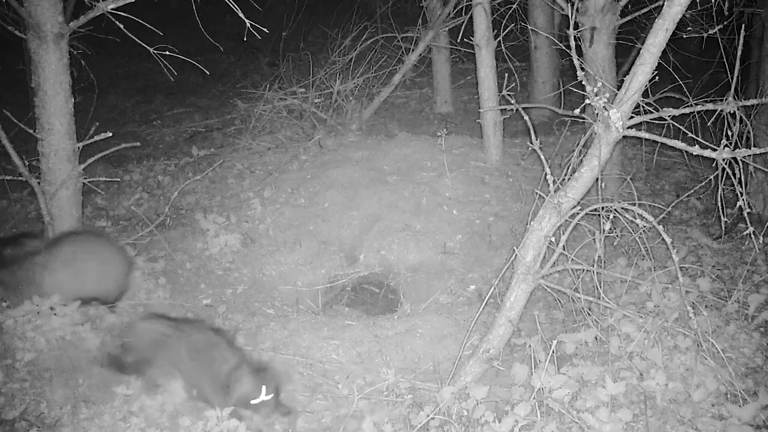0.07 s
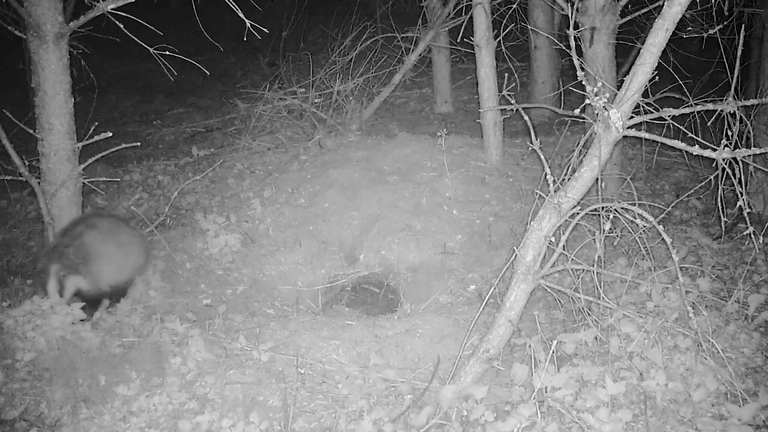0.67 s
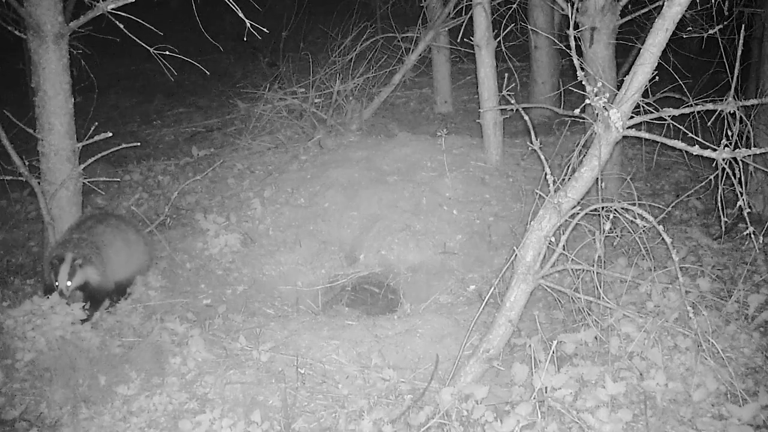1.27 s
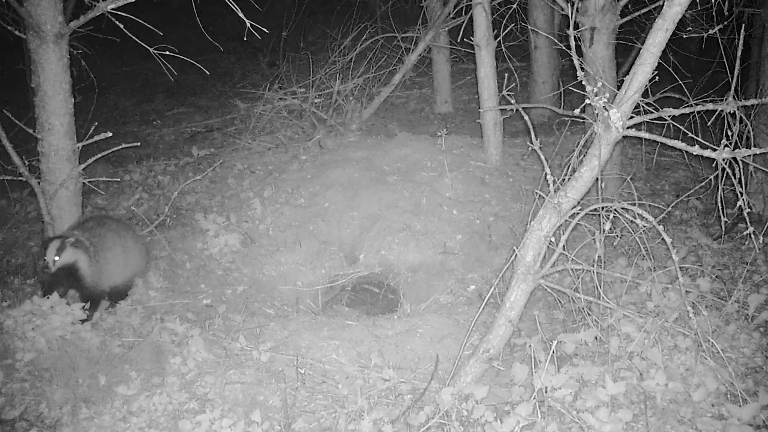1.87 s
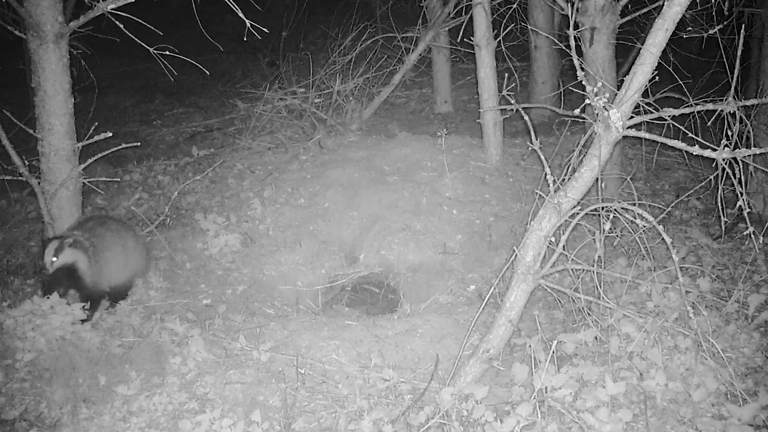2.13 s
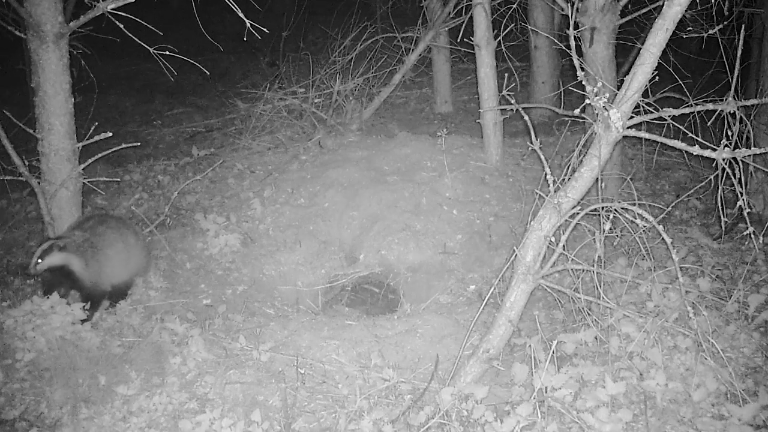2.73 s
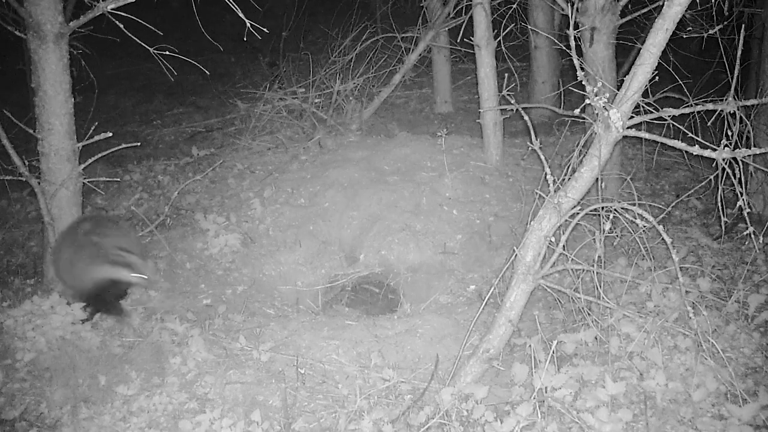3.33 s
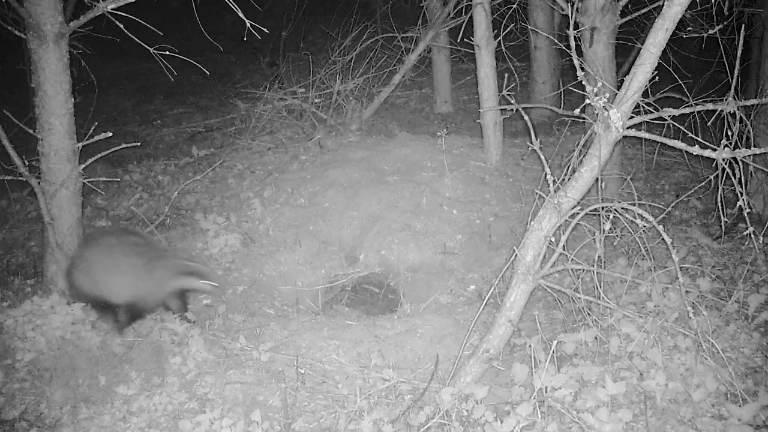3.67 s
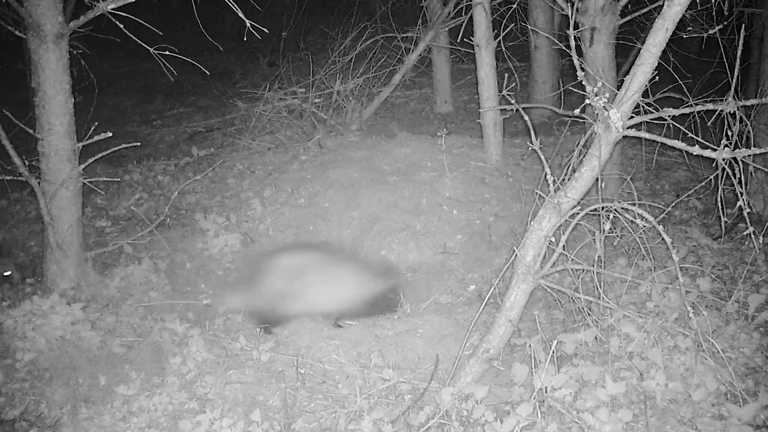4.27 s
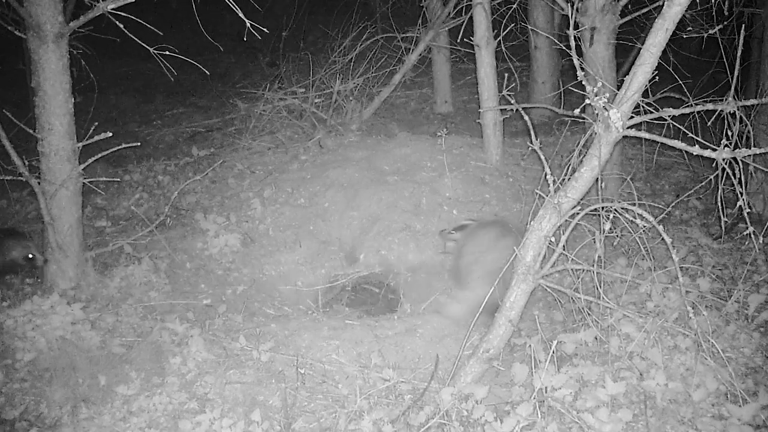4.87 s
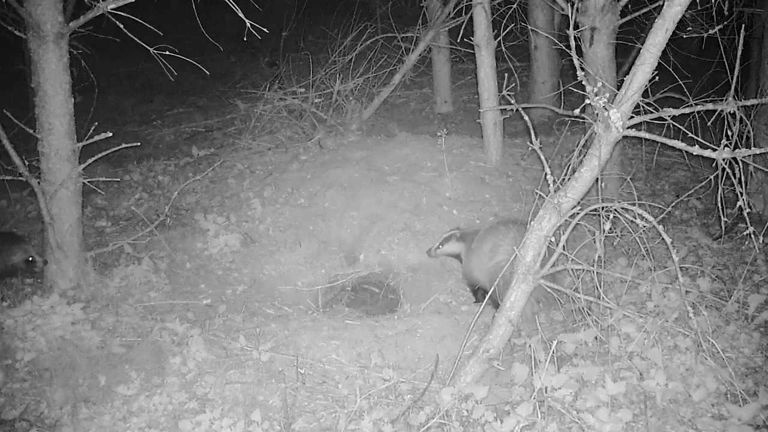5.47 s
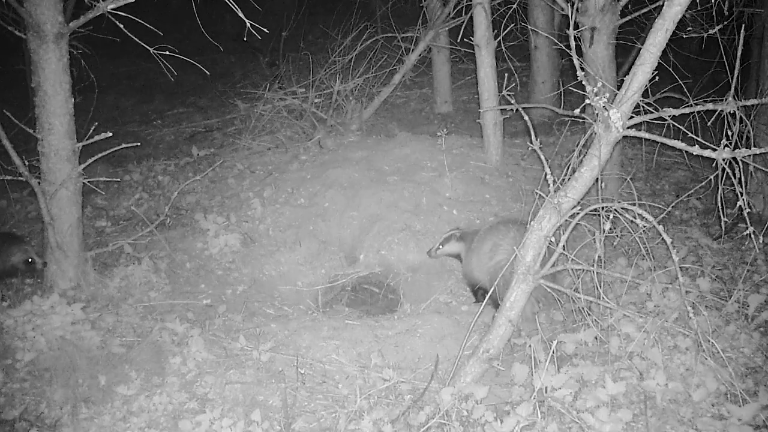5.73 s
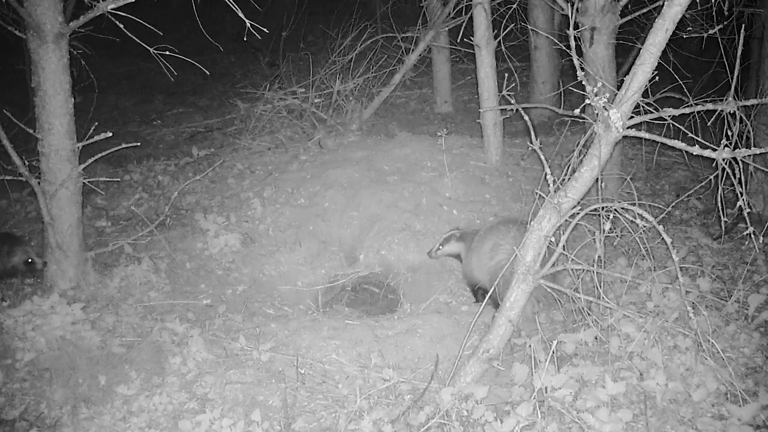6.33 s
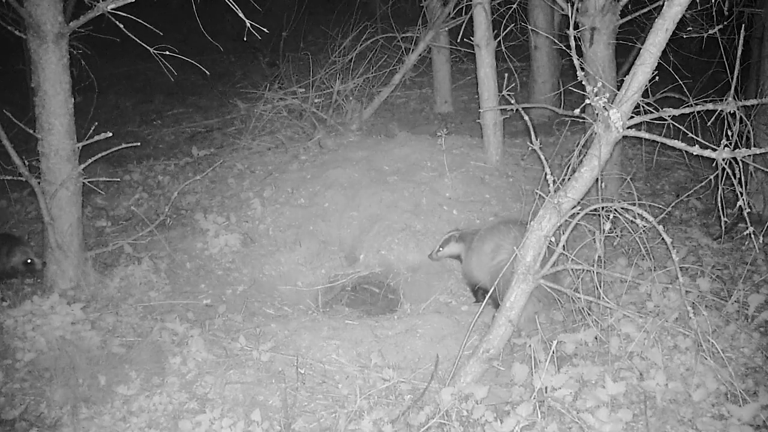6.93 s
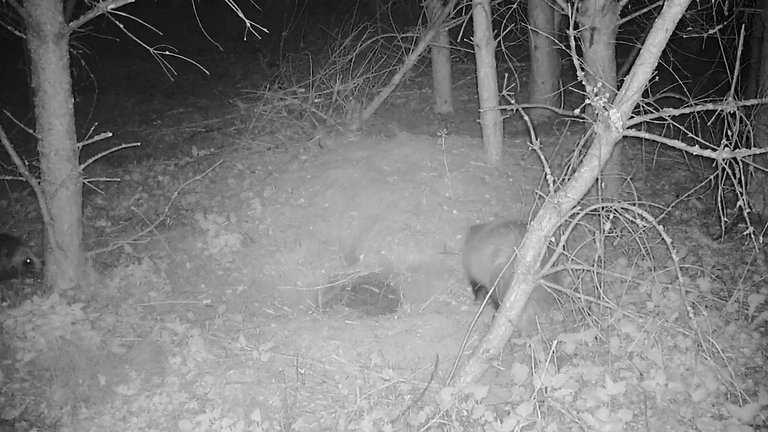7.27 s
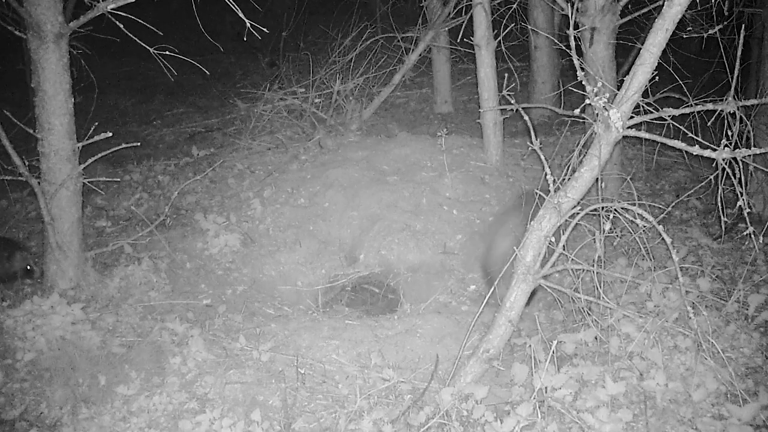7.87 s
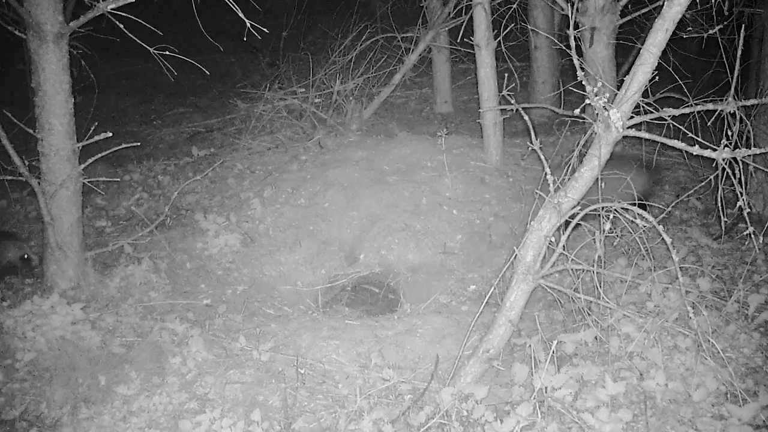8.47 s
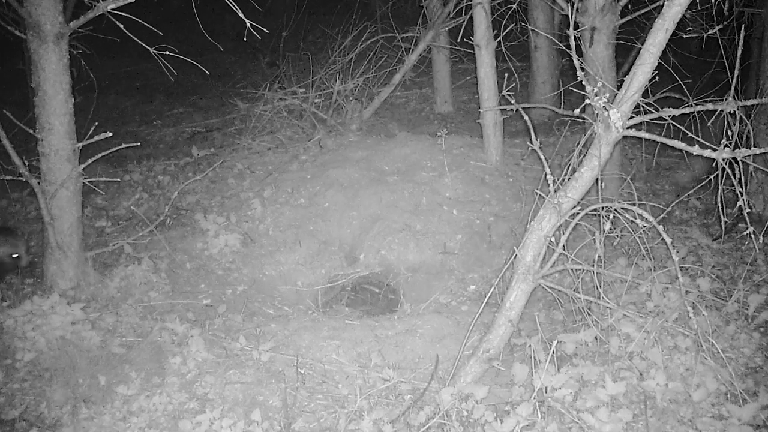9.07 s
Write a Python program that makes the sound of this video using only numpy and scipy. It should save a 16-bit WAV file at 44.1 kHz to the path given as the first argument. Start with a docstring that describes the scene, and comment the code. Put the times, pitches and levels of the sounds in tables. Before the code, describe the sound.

Close to a hissing, faintly whistling trail camera in the woods, a badger snarls, screams harshly and trails off in a drawn-out whine and rasping breath. Under the cry, two animals scuffle with dull thuds, crackling leaves and snapping twigs. After a pause, softer steps and low, creaking growls follow. The hiss drops out twice for an instant, then paws knock on wood and patter off through the leaves.

```python
"""Two badgers fight in leaf litter at night, near a trail camera that hisses and whistles thinly.
First a hoarse snarl, air forced past a flapping throat, breaks into a rattling scream, while paws
thud on soil, crush leaves and snap twigs. The scream clears to a long whine that ends in rasps by
2 s. From 3.5 s come low, creaky growls. After 6 s the camera's sound cuts out twice. Last, paws
knock on fallen wood and rustle away over leaves and twigs."""
import sys
import numpy as np
from scipy import signal
from scipy.io import wavfile
from scipy.ndimage import uniform_filter1d

SR = 44100
rng = np.random.default_rng(int(sys.argv[2]) if len(sys.argv) > 2 else 0)


def to_wav(sig):
    """Store sig (one row per channel, or 1-D mono) as 16-bit WAV at the path in sys.argv[1].

    Samples outside -1..1 are clipped; the rate is SR.
    """
    pcm = np.clip(np.atleast_2d(sig), -1, 1) * 32767
    pcm = np.round(pcm).astype(np.int16)
    wavfile.write(sys.argv[1], SR, pcm.T)  # frames by channels


N = 406161
T = np.arange(N) / SR
SCREAM_S, WHINE_S, CRY_END_S = .408, .69, 1.9  # the scream starts, turns to a whine, and stops
CLOSING_S = .15  # how long the mouth takes to close at the end of the whine


# The scream's tune. Each row: time in seconds, pitch in Hz.
SCREAM_TUNE = [(.408, 1132), (.435, 1302), (.458, 1345), (.52, 1060), (.61, 826), (.69, 730)]
# How the throat shapes the scream. Each row: frequency in Hz, boost or cut in dB.
SCREAM_TONE = [(100, -47), (450, -36), (620, -15), (780, -3), (1000, 1), (1270, 7.5), (1520, 3.5),
               (1720, 7.5), (1950, -3.5), (2150, 5), (2380, -5.5), (2700, 4.5), (3000, -2.5), (3450, 4.5),
               (4050, -2.5), (4900, -6.5), (5600, -29), (6700, -15.5), (11000, -56)]

def scream(start_db=-17, hold_s=.064, sag_db_per_s=18, release_s=.0079, swoop=.14, jitter=.165):
    """Shrill vocal folds grow rough as a rattle chops them into bursts, each swooping up in pitch."""
    t = np.arange(SCREAM_S, WHINE_S + release_s / 2, 1 / SR)
    age = t - SCREAM_S
    hz = follow(SCREAM_TUNE, t)[0]
    opening = rattle(t)
    rough = np.interp(age, [0, .12], [.23, .494])  # the share of breath in the voice
    effort_db = start_db - sag_db_per_s * np.maximum(age - hold_s, 0)
    bend = 1 + swoop * (opening - .7) + jitter * rough * wander(t, 900) + .01995 * wander(t, 89.74)
    cycles = np.cumsum(hz * bend) / SR
    # no two cycles are alike, which smears the overtones
    folds = sum(np.cos(2 * np.pi * k * cycles + min(k - 1, 2) * wander(t, 1800)) for k in range(1, 9))
    breath = evened((.64 + np.exp(-(cycles % 1) / .67)) * rng.standard_normal(len(t)))
    chop = (.64 + opening) * gain_of(1.2 * wander(t, 223.4))
    voice = colour(((1 - rough) * evened(folds) + rough * breath) * chop, SCREAM_TONE)
    # the treble brightens with effort and at the height of each burst
    body = low_pass(voice, hz=4200, order=6)
    treble = (voice - body) * gain_of(2.8 * (effort_db - effort_db.mean())) * (.5 + .5 * opening)
    release = np.minimum((t[-1] - t) / release_s, 1)
    return t[0], gain_of(effort_db) * evened(body + treble) * release * fade(t, .0012)


def rattle(t, fast_per_s=85, slow_per_s=66.2, slows_at_s=.48):
    """How far the throat stands open, 0 to 1. It flaps a little unevenly, fast and then slower."""
    fast_flaps = fast_per_s * (np.minimum(t, slows_at_s) - SCREAM_S)
    slow_flaps = slow_per_s * np.maximum(t - slows_at_s, 0)
    flaps = fast_flaps + slow_flaps + .045 * wander(t, 70.4)
    return np.sin(np.pi * (flaps % 1) ** .75) ** 2


# The whine's tune. Each row: time in seconds, pitch in Hz.
WHINE_TUNE = [(0.7, 727), (0.706, 733), (0.858, 718.7), (1.202, 643.5), (1.308, 654), (1.358, 628),
              (1.406, 644), (1.568, 654.5), (1.578, 641.3), (1.7, 649.5), (1.72, 669), (1.89, 676)]
# How the throat shapes the whine's overtones. Each row: frequency in Hz, boost or cut in dB.
WHINE_TONE = [(1250, 3), (1450, -9), (1950, 0), (2080, 0), (2180, 1), (3200, 0.5), (3600, -6.5), (3950, -9),
              (4500, -20), (4950, -10), (5150, -11.5), (5350, -13), (5800, -29), (9000, -28)]

def whine(sag_db_per_s=2.75, strain_s=.2, push_s=.23, shimmer_db=1.6, fray=.035):
    """The vocal folds settle into a clear cry as the strain of the scream wears off."""
    t = np.arange(WHINE_S, CRY_END_S, 1 / SR)
    age = t - WHINE_S
    hz = follow(WHINE_TUNE, t)[0]
    strain = .066 + .62 * np.exp(-(age / strain_s) ** 2)
    bend = 1 + .0039 * (1 + 3 * strain) * wander(t, 500) + .0033 * wander(t, 43.8)
    cycles = np.cumsum(hz * bend) / SR
    sag_db = sag_db_per_s * age
    push_db = 8 * np.exp(-(age / push_s) ** 2)  # the scream's push lingers in the overtones
    # as the mouth closes, the overtones fade fast and the base note slowly
    closing_s = np.maximum(t - CRY_END_S + CLOSING_S, 0)
    base_db = -36.5 - sag_db - 5 * strain - 43 * closing_s
    overtone_db = -33 - sag_db + push_db - 260 * closing_s
    fourth_db = -33.5 - sag_db - 9 * strain - 260 * closing_s
    # harmonics 2 and 3 share the overtone level between them
    second, third = (gain_of(db_at(WHINE_TONE, k * hz)) for k in (2, 3))
    overtone_db -= 20 * np.log10(np.hypot(second, third))
    # harmonic 4 flutters more once the pitch has sunk
    flutter_db = 6 * np.interp(t, [1.1, 1.2], [.15, 1])
    fourth_db += flutter_db * np.minimum(wander(t, 95.5), .8)
    voice = np.zeros(len(t))
    for k in range(1, 14):
        db = {1: base_db, 4: fourth_db}.get(k, overtone_db + db_at(WHINE_TONE, k * hz))
        hoarse = 1 + .27 * strain * wander(t, 450)
        blur = fray * max(k - 5, 0) * wander(t, 700)  # only the top overtones fray
        level = np.sqrt(2) * gain_of(db + shimmer_db * wander(t, 40.7)) * hoarse
        voice += level * np.cos(2 * np.pi * (k * cycles + blur + rng.random()))
    breath = colour(rng.standard_normal(len(t)) * (1 + np.cos(2 * np.pi * cycles)), SCREAM_TONE)
    voice += breath * gain_of(overtone_db - 28 + 37.2 * strain)
    chop = 1 + strain * (rattle(t) - .5)
    return t[0], voice * chop * fade(t, .005)


# The snarl's one swell. Its row: peak time in seconds, level in dB, rise and fall in seconds.
SNARL_SWELL = [(.21, -27, 0.45, 0.31)]
# How the throat shapes the snarl. Each row: frequency in Hz, boost or cut in dB.
SNARL_TONE = [(100, -36), (300, -8.5), (600, -10), (850, 2.5), (1100, 3.5), (1250, -4.5), (1680, 2),
              (2200, -13), (3100, -7), (3750, 1), (4300, -1.5), (5400, -24), (6500, -6.5), (9000, -32)]

def snarl():
    """Hoarse breath through a half-open mouth, up to the start of the scream."""
    return 0, hoarse_breath(SNARL_SWELL, SNARL_TONE, flutter_hz=104.8, depth=1.8, until_s=SCREAM_S)


# Rasps in the throat. Each row: peak time in seconds, level in dB, rise and fall in seconds.
RASP_SWELLS = [(1.618, -34, 0.049, .08), (1.76, -37.5, 0.11, 0.18), (1.925, -42, 0.037, 0.061)]
# How the throat shapes the rasps. Each row: frequency in Hz, boost or cut in dB.
RASP_TONE = [(100, -28), (600, -12.5), (1100, 0), (1800, -8), (2500, -5), (3700, -19), (4600, 5.5),
             (5400, -17), (9000, -22)]

def rasp(shut_treble_db=-9):
    """Hoarse breath as the whine gives out; it gets duller as the mouth closes."""
    breath = hoarse_breath(RASP_SWELLS, RASP_TONE, flutter_hz=114.7, depth=2.9, until_s=2)
    body = low_pass(breath, hz=2600, order=3)
    shut = np.clip((T[:len(breath)] - CRY_END_S + CLOSING_S) / CLOSING_S, 0, 1)
    return 0, body + (breath - body) * gain_of(shut_treble_db * shut)


def hoarse_breath(rows, tone, flutter_hz, depth, until_s):
    """Air forced past unevenly flapping tissue comes out in quick puffs."""
    t = T[T < until_s]
    flaps = np.cumsum(flutter_hz * (1 + .28 * wander(t, 120))) / SR
    puffs = (1 + depth * np.exp(-(flaps % 1) / .45)) * rng.standard_normal(len(t))
    return swells(rows)[:len(t)] * colour(puffs, tone) * fade(t, .0036)


# Low growls, one list for each. Each row: time in seconds, pitch in Hz, level in dB.
GROWL_TUNES = [
    [(3.54, 118.4, -59), (3.65, 131.7, -49.5), (3.88, 128.3, -50), (4.02, 118.6, -55), (4.14, 115.6, -55.5),
     (4.26, 101, -57), (4.34, 104, -61)],
    [(4.66, 108, -56), (4.75, 140, -50), (4.82, 129.4, -50), (4.9, 135, -53)],
    [(4.67, 92, -60), (4.95, 82.3, -67), (5.12, 90.6, -64), (5.27, 98, -58), (5.45, 94, -63),
     (5.58, 92, -63)],
]

def growl(rows, octave_db=-18):
    """With the mouth closed, little gets out but a wavering low note and its faint octave."""
    t = np.arange(rows[0][0], rows[-1][0], 1 / SR)
    hz, db = follow(rows, t)
    phase = 2 * np.pi * np.cumsum(hz * (1 + .032 * wander(t, 57.7))) / SR
    note = evened(np.sin(phase) + gain_of(octave_db) * np.sin(2 * phase))
    return t[0], note * gain_of(db + 1.6 * wander(t, 39.3)) * fade(t, .02)


# Creaks over the growls. Each row: start and length in seconds, pulses per second, level in dB.
THROAT_CREAKS = [(4.675, .045, 40, -46.5), (4.765, .1, 43, -51), (4.926, .22, 42.8, -50),
                 (5.24, .04, 48, -52)]
# How the throat shapes a creak. Each row: frequency in Hz, boost or cut in dB.
CREAK_TONE = [(50, -50), (300, -16), (700, -10), (1100, 0), (1650, -3.5), (2050, -11), (4000, -28)]

def creak(start, length, per_s, db):
    """The vocal folds snap slowly; each snap rings the throat, with a small puff behind it."""
    t = np.arange(0, length, 1 / SR)
    clicks = pulses(np.full(len(t), per_s)) * gain_of(2 * np.tanh(wander(t, 43)))
    puffs = .08 * linger(clicks, seconds=.004) * rng.standard_normal(len(t))
    return start, gain_of(db) * colour(clicks + puffs, CREAK_TONE)


# Paws in the leaves, near and far. Each row: peak time in seconds, level in dB, fall in seconds.
NEAR_PAWS = [(.035, -36, 0.22), (.16, -42, 0.11), (.345, -47, .06), (.395, -40, .03), (.58, -40, 0.096),
             (.7, -41, 0.045), (.827, -38, 0.029), (.922, -29, 0.058), (1.07, -35.5, 0.17),
             (1.205, -30, 0.089), (1.37, -37, 0.16), (1.5, -43, 0.081), (1.625, -44.5, .2)]
FAR_PAWS = [(3.455, -46, 0.21), (3.565, -42.5, 0.083), (3.72, -49, 0.077), (3.825, -50, .04),
            (3.905, -45.5, 0.06), (3.955, -49.5, 0.066), (4.21, -50, .05), (4.58, -46.5, 0.12),
            (8.73, -41.5, 0.17), (8.95, -44.5, .1), (9.065, -53, .06)]
# Bodies brushing past. Each row: peak time in seconds, level in dB, rise and fall in seconds.
NEAR_BODIES = [(.3, -42.5, 1.5, 1.53)]
FAR_BODIES = [(3.6, -51, .45, 0.92), (4.58, -43.5, 0.097, 0.49), (4.9, -48.5, 1.02, 0.94),
              (8.75, -52, 1.5, 1.3)]
# The tone of the leaves. Each row: frequency in Hz, boost or cut in dB.
NEAR_LEAF_TONE = [(60, -34), (300, -17), (1000, -8), (3000, -12.5), (4200, 5), (5600, 3.5), (6300, -4.5),
                  (7300, -5), (8400, 1), (9500, -2), (10500, -13), (12500, -20), (15000, -9), (16000, -11)]
FAR_LEAF_TONE = [(60, -51), (200, 3), (800, -3.5), (2800, -8), (4100, 2), (5000, -1.5), (6200, -1),
                 (7200, 0), (8200, -7), (9400, -1.5), (11000, -13), (15000, -10), (16000, -26)]

def leaves(paws, bodies, tone, press_s, trim_db, cracks_per_s, spread_db, clump_db, brush):
    """Dry leaves break in clumps of tiny cracks over a soft brushing; trim_db shifts every level."""
    level = swells([(s, db, press_s, fall_s) for s, db, fall_s in paws] + list(bodies))
    sizes = gain_of(spread_db * np.minimum(rng.exponential(1, N), 4))
    cracks = sizes * (rng.random(N) < cracks_per_s / SR)
    ringing = np.sqrt(linger(cracks ** 2, seconds=.00098))
    crackle = (evened(ringing) + brush) * rng.standard_normal(N)
    clumps = gain_of(clump_db * wander(T, 90))
    return 0, gain_of(trim_db) * level * colour(crackle * clumps, tone)


# Twigs snapping. Each row: start in seconds, level in dB before the trim, ring in Hz,
# seconds to fade by 60 dB.
TWIG_SNAPS = [(0.0657, -12, 4700, 0.024), (0.0943, -18, 3910, 0.02), (0.341, -16, 4130, 0.011),
              (0.356, -20, 3630, 0.023), (0.393, -14.5, 3600, 0.023), (0.824, -21, 3590, 0.013),
              (0.8636, -10, 4260, 0.012), (0.9158, -20, 3470, 0.013), (0.9945, -16.5, 4560, 0.012),
              (1.0877, -29, 4810, 0.016), (1.2007, -20, 5450, 0.016), (1.3643, -27, 4900, 0.011),
              (1.414, -28, 3870, 0.018), (1.4596, -27, 3890, 0.011), (3.823, -32.5, 4050, 0.0093),
              (4.2117, -31.5, 4530, 0.0099), (4.652, -34.5, 4680, 0.016), (4.7701, -38, 7200, 0.01),
              (8.396, -39, 6590, 0.016), (8.6086, -36.5, 7060, 0.014), (8.717, -25.5, 6520, 0.01),
              (8.757, -23, 9460, 0.017), (8.782, -32, 4100, 0.014), (9.0634, -35.5, 7190, 0.016),
              (9.1977, -21.5, 3560, 0.022)]
# The tone all twigs share. Each row: frequency in Hz, boost or cut in dB.
TWIG_TONE = [(60, -30), (500, -16.5), (2600, -7.5), (4000, 1), (6500, 1), (8200, -5), (9500, -2),
             (12000, -19), (15000, -9), (16000, -1.5)]

def twig(start, db, ring_hz, decay_s, trim_db=-2, ring_db=9):
    """A twig breaks with a bright snap and a broad ring of its own."""
    hz = np.geomspace(50, 16000, num=80)
    ring = ring_db * np.exp(-(np.log(hz / ring_hz) / .16) ** 2)
    tone = np.c_[hz, db_at(TWIG_TONE, hz) + ring]
    return start, crack(db + trim_db, decay_s, tone, tail_db=-16)


# Paws on fallen wood. Each row: start in seconds, level in dB, seconds to fade by 60 dB.
WOOD_KNOCKS = [(7.89, -33.5, 0.029), (8.011, -40, .04), (8.017, -38.5, 0.097), (8.043, -45, .03)]
# The tone of the wood. Each row: frequency in Hz, boost or cut in dB.
WOOD_TONE = [(30, -37), (60, -14), (130, 14.5), (350, -4.5), (1000, -5), (1350, -5), (1800, 5), (2300, -9),
             (2750, 0), (3400, -9), (5000, -6), (8000, -23), (15000, -30)]

def knock(start, db, decay_s):
    """A paw strikes fallen wood with a low, short knock."""
    return start, crack(db, decay_s, WOOD_TONE, tail_db=-22)


def crack(db, decay_s, tone, tail_db):
    """A quickly dying burst of noise, with a faint tail scattered by the ground."""
    t = np.arange(SR // 8) / SR
    envelope = gain_of(-60 * t / decay_s) + gain_of(tail_db - 60 * t / .091)
    burst = colour(envelope * rng.standard_normal(len(t)), tone)
    loudest = np.sqrt(uniform_filter1d(burst ** 2, size=66).max())
    return gain_of(db) * burst / loudest


# Heavy thuds on the soil. Each row: peak time in seconds, level in dB.
SOIL_THUDS = [(.025, -30.5), (.115, -38), (.24, -44), (.32, -43), (.497, -46.5), (.615, -42), (.808, -45),
              (1.0, -48)]
# Lighter trampling. Each row: peak time in seconds, level in dB, rise and fall in seconds.
SOIL_TRAMPLING = [(.75, -52, 1.3, 1.1), (1.68, -52.5, 0.6, 0.47)]
# The tone of the soil. Each row: frequency in Hz, boost or cut in dB.
SOIL_TONE = [(25, -62), (45, -48), (65, -23), (95, -8.5), (125, 5.5), (170, -10.5), (260, -23), (600, -17),
             (1500, -36)]

def scuffle(pushes_per_s=70, rise_s=.05, fall_s=.062):
    """Bodies and paws give the soft soil dull, uneven pushes."""
    level = swells([(s, db, rise_s, fall_s) for s, db in SOIL_THUDS] + list(SOIL_TRAMPLING))
    pushes = pulses(pushes_per_s * np.exp(.69 * wander(T, 80))) * rng.choice([-1, 1], N)
    return 0, level * colour(pushes, SOIL_TONE)


def tree_echo(sound, echo_db=-22, decay_s=.55):
    """Adds the faint, short echo that tree trunks scatter back."""
    t = np.arange(SR // 2) / SR
    bounces = rng.standard_normal(len(t)) * (rng.random(len(t)) < .04) * (t > .012)
    bounces *= gain_of(-60 * t / decay_s)
    return sound + gain_of(echo_db) * signal.oaconvolve(sound, bounces / np.linalg.norm(bounces))[:N]


# The camera's whistle. Each row: harmonic number, level in dB compared with the hiss.
WHISTLE_HARMONICS = [(1, -8.5), (3, -17.5), (5, -19.5), (7, -23), (9, -29), (11, -26)]

def whistle(hz=1412.5):
    """The camera's thin, steady note, made of odd harmonics."""
    return sum(np.sqrt(2) * gain_of(db) * np.sin(2 * np.pi * k * hz * T) for k, db in WHISTLE_HARMONICS)


# The tone of the hiss and of the churned litter. Each row: frequency in Hz, boost or cut in dB.
HISS_TONE = [(25, -69), (50, -47), (80, -18), (130, -1), (269, -4.5), (382, -6), (680, -9), (1240, -11),
             (1700, -13), (3400, -14), (4340, -14), (5720, -15.5), (12800, -17), (16000, -20.5)]

def background(hiss_db=-49.5, step_db=3, churn_db=-40, churn_end_s=2.18, dip_db=-14, return_s=.72):
    """Camera hiss and whistle, and a dull wash of churned litter; all dip under the scream."""
    hiss_level = gain_of(hiss_db + step_db * (T > CUT_OUTS[0]))  # louder after the first cut-out
    churn_level = gain_of(churn_db - 5 * T) * np.clip((churn_end_s - T) / .18, 0, 1)
    noise = np.hypot(hiss_level, churn_level) * colour(rng.standard_normal(N), HISS_TONE)
    dip = gain_of(dip_db * (T > SCREAM_S) * np.clip(1 - (T - SCREAM_S) / return_s, 0, 1))
    return dip * (noise + hiss_level * whistle())


# When the camera's sound cuts out. Each entry: start in seconds.
CUT_OUTS = [6.225, 6.759]

def cut_outs(return_s=.036, muted_db=-33):
    """The camera's volume, which twice drops at once and quickly fades back in."""
    shut = sum((T >= s) * np.exp(-(abs(T - s) / return_s) ** 3) for s in CUT_OUTS)
    return 1 - shut * (1 - gain_of(muted_db))


def gain_of(db):
    """Turns decibels into a number to multiply by."""
    return 10 ** (np.asarray(db) / 20)


def evened(x):
    """Scales a signal to an average (rms) level of 1."""
    return x / np.sqrt(np.mean(x ** 2) + 1e-20)


def db_at(tone, hz):
    """A tone table's boost or cut at the given frequencies."""
    table_hz, db = np.transpose(tone)
    return np.interp(np.log(hz + 1), np.log(table_hz + 1), db)


def colour(x, tone, size=4096):
    """Filters a sound by a tone table, with no ringing ahead of it, and evens it to level 1."""
    log_gain = np.log(gain_of(db_at(tone, abs(np.fft.fftfreq(size, 1 / SR)))))
    taps = np.fft.ifft(np.exp(np.conj(signal.hilbert(log_gain)))).real[:size // 2]
    return evened(signal.oaconvolve(x, taps)[:len(x)])


def low_pass(x, hz, order):
    """Keeps the part of a sound below hz."""
    return signal.sosfiltfilt(signal.butter(order, hz, fs=SR, output="sos"), x)


def linger(clicks, seconds):
    """Gives each click a dying tail."""
    return signal.lfilter([1], [1, -np.exp(-1 / (seconds * SR))], clicks)


def follow(rows, t):
    """Joins timed rows with straight lines, giving one curve for each value column."""
    times, *columns = np.transpose(rows)
    return [np.interp(t, times, column) for column in columns]


def fade(t, seconds):
    """A short fade in and fade out."""
    return np.clip(np.minimum(t - t[0], t[-1] - t) / seconds, 0, 1)


def wander(t, per_s):
    """A random wobble of level 1 that heads for a new value per_s times a second."""
    knots = np.arange(t[0], t[-1] + 2 / per_s, 1 / per_s)
    return evened(np.interp(t, knots, rng.standard_normal(len(knots))))


def pulses(per_s):
    """Clicks at a rate that may change over time."""
    return np.diff(np.floor(np.cumsum(per_s) / SR), prepend=-1)


def swells(rows):
    """Overlapping humps of loudness, each 20 dB down one rise before its peak and one fall after."""
    power = np.zeros(N)
    for peak_s, db, rise_s, fall_s in rows:
        distance = (T - peak_s) / np.where(T < peak_s, rise_s, fall_s)
        power += gain_of(db - 20 * np.minimum(distance ** 2, 10)) ** 2
    return np.sqrt(power)


def scene():
    """Lays each voice and footfall in at its start time, then adds the echo and the background."""
    sounds = [snarl(), scream(), whine(), rasp(), scuffle()]
    sounds += [growl(rows) for rows in GROWL_TUNES]
    sounds += [creak(*row) for row in THROAT_CREAKS]
    sounds += [leaves(NEAR_PAWS, NEAR_BODIES, NEAR_LEAF_TONE, press_s=.037, trim_db=1.5,
                      cracks_per_s=1700, spread_db=5, clump_db=1.25, brush=.64)]
    sounds += [leaves(FAR_PAWS, FAR_BODIES, FAR_LEAF_TONE, press_s=.039, trim_db=-.5,
                      cracks_per_s=700, spread_db=2.5, clump_db=.8, brush=.89)]
    sounds += [twig(*row) for row in TWIG_SNAPS]
    sounds += [knock(*row) for row in WOOD_KNOCKS]
    mix = np.zeros(N)
    for start, sound in sounds:
        part = mix[round(start * SR):][:len(sound)]
        part += sound[:len(part)]
    return (tree_echo(mix) + background())[None]


def record(dry, top_hz=15850):
    """The camera cuts out twice, rounds off the loudest peaks and drops the highest treble."""
    rounded = np.tanh(dry * cut_outs())
    treble_cut = signal.firwin(511, top_hz, window=("kaiser", 9), fs=SR)
    return signal.oaconvolve(rounded, treble_cut[None], "same")


dry = scene()
out = record(dry)
to_wav(out)
```